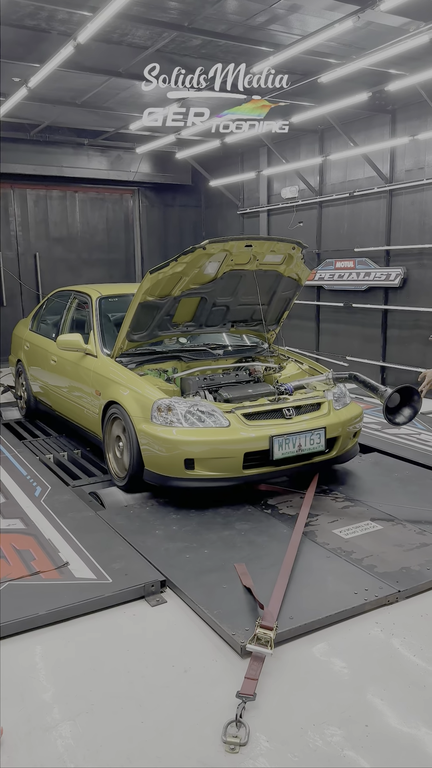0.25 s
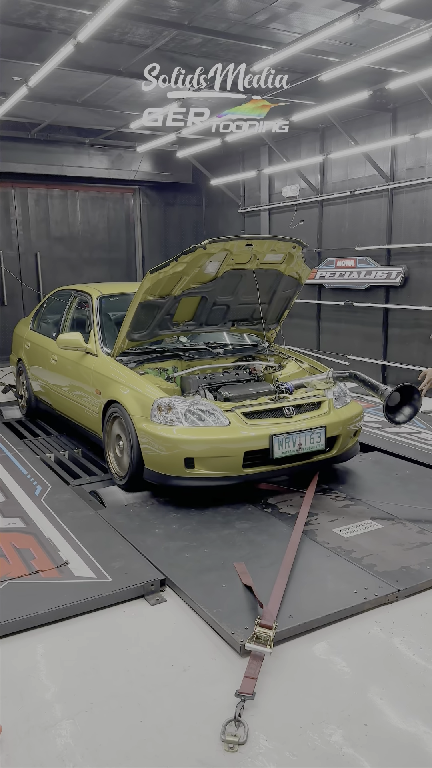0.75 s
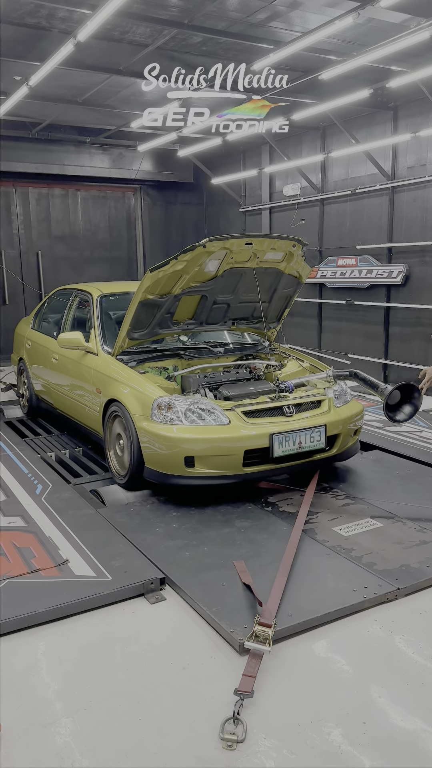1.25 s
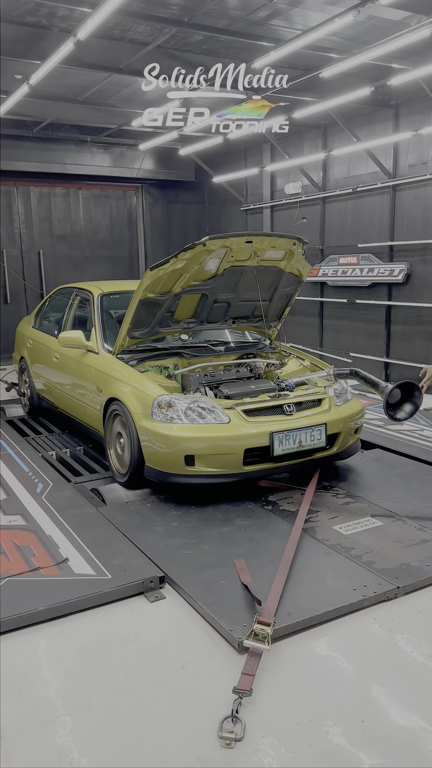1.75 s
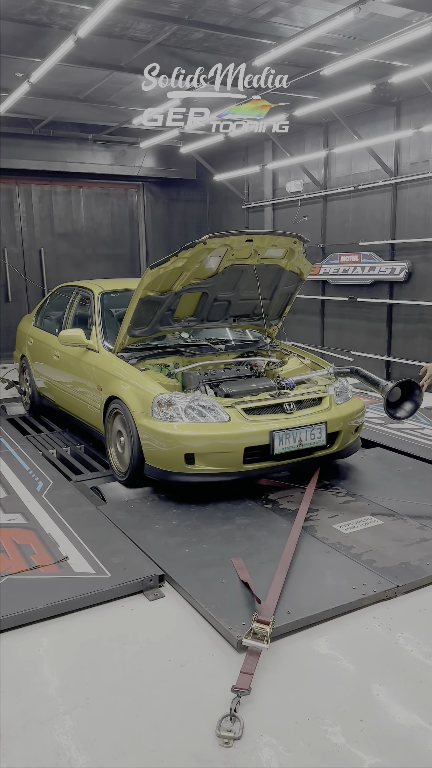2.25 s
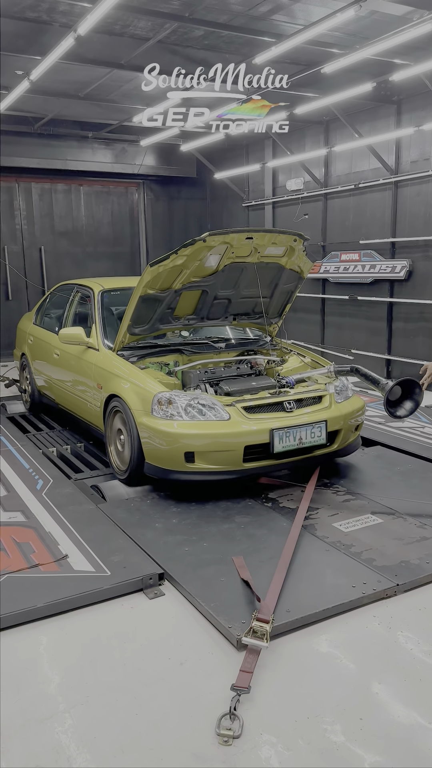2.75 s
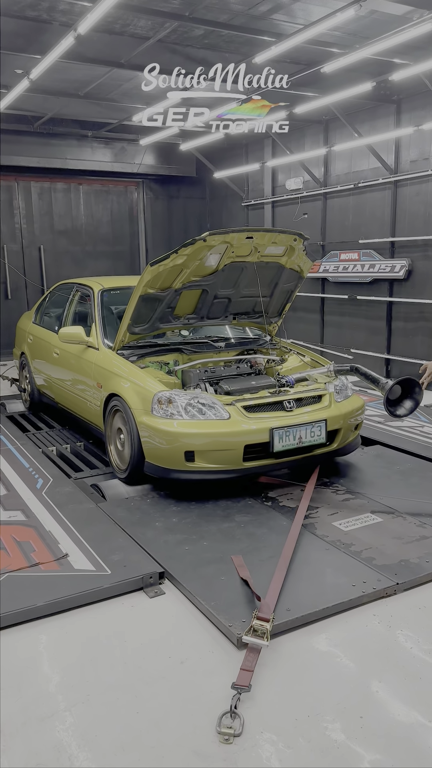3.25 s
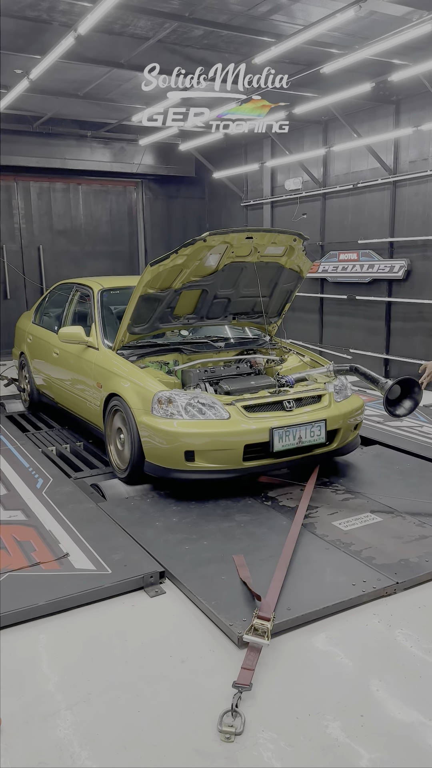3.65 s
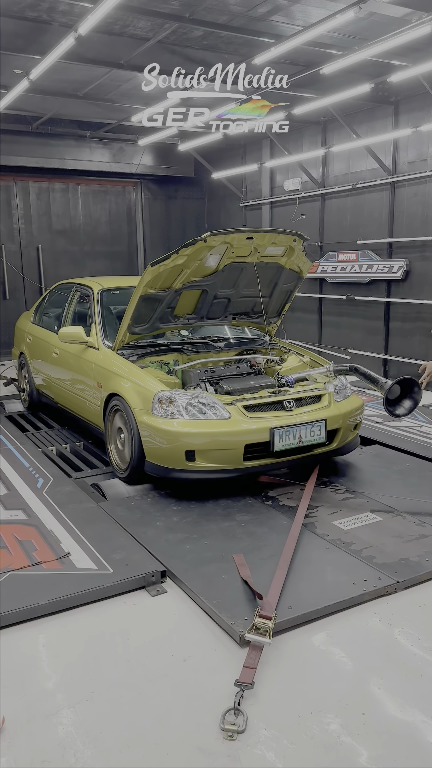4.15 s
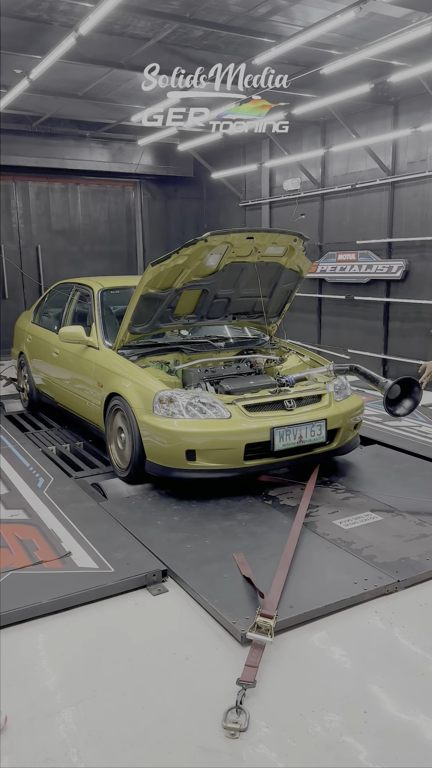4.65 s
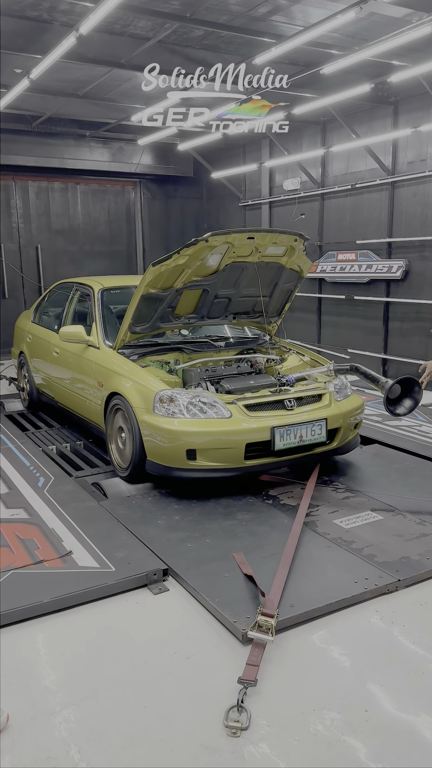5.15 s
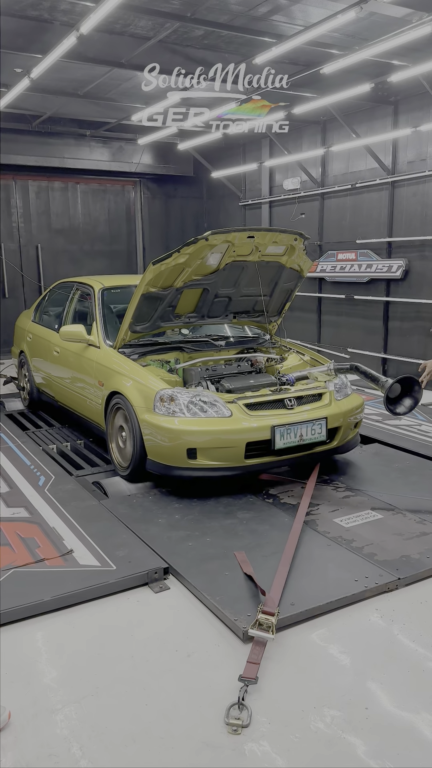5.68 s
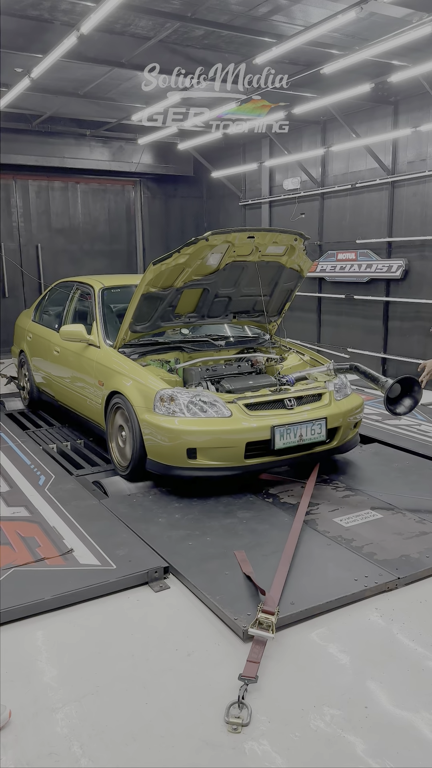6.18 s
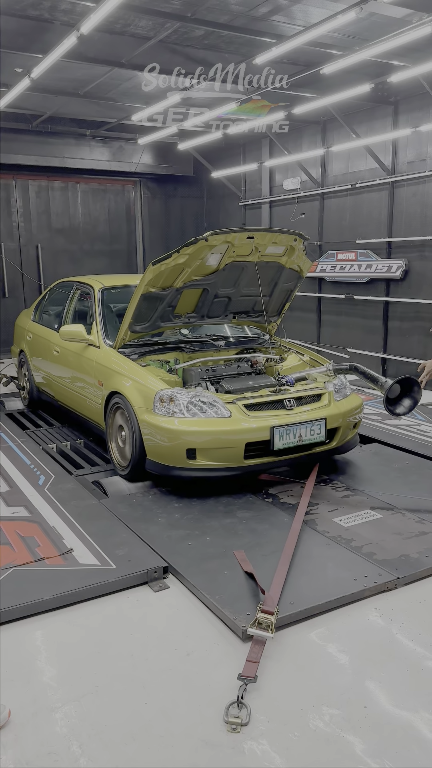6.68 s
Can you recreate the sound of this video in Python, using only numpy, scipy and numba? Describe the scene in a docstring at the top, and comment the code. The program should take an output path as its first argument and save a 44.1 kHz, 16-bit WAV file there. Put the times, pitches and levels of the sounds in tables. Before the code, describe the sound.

A four-cylinder car engine is already at full throttle on a roller dynamometer, heard close in a closed, hard-walled room with short reflections. Its roar rises steadily in pitch, with overtones swelling and fading along the way. At about 1.3 seconds a brief rasp marks the cam change, and the sound turns brighter and harder, with more valve clatter and hissing air. Around 2.4 seconds come a few very quick, light knocks and a swell of low rumble. The revs keep climbing until about 6 seconds, when the engine hits the limiter and stutters with rapid misfire thuds and an exhaust gurgle. At about 6.2 seconds the throttle shuts: the roar drops sharply and the engine coasts, falling in pitch, until the end near 7 seconds. Underneath run a faint fan hum, an uneven rumble and a low roller drone that is strongest at the end.

```python
"""In a closed, hard-walled room, a four-cylinder car engine pulls at full throttle on a roller dynamometer.
It switches to its high-speed cam, climbs to the rev limiter, misfires, and coasts with the throttle shut.
Periodic firing radiates orders, harmonics of the engine cycle, which swell and fade as they sweep through
the resonances of exhaust, intake and room. Valve-train clatter and turbulent hiss lie above them,
and the drone of the rollers, the hum of a fan motor and a lumpy low rumble lie beneath."""
import sys
import numpy as np
from scipy import signal
from scipy.fft import rfft, irfft, next_fast_len
from scipy.io import wavfile
from scipy.ndimage import uniform_filter1d
from numba import njit

SR = 44100
rng = np.random.default_rng(int(sys.argv[2]) if len(sys.argv) > 2 else 0)


def digitize_waveform(pressure):
    """Quantize a signal to 16-bit integers and store it at the path in sys.argv[1].

    Rows of a 2-D input are taken as channels; values are limited to [-1, 1].
    """
    field = np.atleast_2d(pressure).T
    bounded = np.clip(field, -1, 1)
    quanta = np.round(bounded * 32767).astype(np.int16)
    wavfile.write(sys.argv[1], SR, quanta)


N = 305172
BLOCK = 64  # samples per control value
TIMES, BLOCK_TIMES = np.arange(N) / SR, np.arange(N // BLOCK + 2) * BLOCK / SR
CAM_S, CAM_TAKES_S = 1.34, .022  # the cam changes over
SHUT_S, SHUT_TAKES_S = 6.235, .09  # the throttle closes
LOW_CAM_SPEEDS, HIGH_CAM_SPEEDS = [43.8, 47.5, 51.3], [51.5, 58, 64.5, 71, 77.5]  # cycles/s
FIRING_ORDER = 4  # one cycle is two crank turns and four firings

# Engine speed: (time [s], speed [cycles/s])
ENGINE_SPEED = [(0, 43.85), (.27, 45.2), (.56, 47), (1.02, 49.6), (1.98, 55.15), (2.91, 60.5), (4.1, 67.4),
                (4.93, 72.15), (5.41, 74.7), (5.84, 76.9), (5.99, 77.5), (6.13, 77.7), (6.19, 78.5),
                (6.24, 77), (6.32, 72.6), (6.42, 69.5), (6.65, 61.8), (6.8, 56.6), (6.92, 53.6)]
def engine_cycle():
    """Phase is the integral of speed: gives cycles turned at each sample and speed at each block."""
    turns = np.cumsum(curve(ENGINE_SPEED, np.arange(N + BLOCK) / SR)) / SR
    return turns, curve(ENGINE_SPEED, BLOCK_TIMES)


# Exhaust source: (order, level at 3 low-cam speeds [dB], at 5 high-cam speeds [dB], coasting [dB])
EXHAUST_ORDERS = [(1, -64, -49, -47, -45, -51.5, -50, -42.5, -45, -85),
                  (2, -36, -28, -25.5, -23, -24.5, -31.5, -36, -43, -70),
                  (3, -57, -37.5, -30.5, -23.5, -24.5, -30, -23, -27.5, -64),
                  (4, -6.5, -5.5, -2.5, -5, -8, -8, -8, -11, -26.5),
                  (8, -24, -23, -26, -26.5, -30, -29, -23, -30.5, -62)]
# Surges of the firing order after each fuel cut: (start [s], gain [dB], duration [s])
SURGES = [(6.003, 13.5, 0.03), (6.07, 13, 0.051), (6.137, 13, 0.062), (6.217, 4, 0.043), (6.295, 8.5, 0.01),
          (6.356, 5.5, 0.11)]
def exhaust_note(turns, speed, shut):
    """Periodic gas pulses form a harmonic series, weighted by the standing waves of the exhaust."""
    order, level_db = order_levels(EXHAUST_ORDERS, speed, shut)
    cooling = 1 + .05 * np.clip((BLOCK_TIMES - SHUT_S) / .2, 0, 1)  # cooler gas lowers the modes
    flattening = np.where(order > FIRING_ORDER, .65, .88) * shut  # coasting, the modes stand out less
    level_db += (1 - flattening) * standing_wave_db(order * speed * cooling)
    surge_db = sum(db * arch(BLOCK_TIMES - start, length) for start, db, length in SURGES)
    level_db += surge_db * (order == FIRING_ORDER)
    drift_db = .77 + 2.9 * shut * (order != FIRING_ORDER)
    return harmonics(turns, order, level_db, uneven_db=.7, drift_db=drift_db)


# Standing waves between tailpipe and listener: (frequency [Hz], bandwidth [Hz], gain [dB])
PIPE_MODES = [(66, 29.3, 5), (100.4, 5.4, -9), (118, 0.83, -32), (132.6, 10.2, 5.5), (148.8, 11.1, 2),
              (166, 1.3, -11), (186, 5.7, -20), (199.4, 6.3, -15.5), (219.3, 8.2, -8.5),
              (237.5, 19.7, -10.5), (252.6, 3, -18), (295.8, 14.6, 0), (357.3, 6.8, 4.5), (369, 4.5, 1),
              (380, 0.87, -3), (418.7, 8.5, 13.5), (454, 17, -10.5), (471.4, 3.7, 2), (499, 3.5, 4),
              (514, 27, 2.5), (593.4, 22.3, 14), (631.6, 6.9, 10)]
# Their cancellations: (frequency [Hz], bandwidth [Hz])
PIPE_NULLS = [(77.5, 2), (56, 3.7), (67.5, 4.2), (116.1, 4.8), (145.1, 2.4), (189.6, 3.4), (252.7, 7.8),
              (264.2, 14.6), (307.7, 11), (480, 2.8)]
def standing_wave_db(hz):
    """Interference reinforces a tone at the modes of the exhaust and partly cancels it at the nulls."""
    response = modal_sum(PIPE_MODES, hz)
    for centre, width in PIPE_NULLS:
        response *= 1 - .8 * resonator(hz, centre, width)
    return 20 * np.log10(abs(response) + 1e-3)


# Intake source: (order, level at 3 low-cam speeds [dB], at 5 high-cam speeds [dB], coasting [dB])
INTAKE_ORDERS = [(5, -71, -22, -26, -9.5, -18.5, -24, -25.5, -24.5, -51.5),
                 (6, -20, -24, -28, -36, -28.5, -19.5, -39.5, -25.5, -54),
                 (7, -33, -36, -24.0, -51, -27.5, -20.5, -33, -26, -58),
                 (9, -47, -30.5, -36, -17, -33.5, -19, -14, -23, -52),
                 (10, -33, -30, -29, -23.5, -26.5, -20, -33, -43, -53),
                 (11, -19.5, -23, -37, -34, -10, -25.5, -35.5, -35.5, -53),
                 (12, -30, -28.5, -28.5, -17, -24, -33, -27, -35.5, -64),
                 (13, -31.5, -20.5, -30, -12.5, -35.5, -33, -24.5, -18, -65),
                 (14, -30, -36, -35, -29, -24.5, -24, -17.5, -41, -64),
                 (15, -13.5, -25, -35, -24.0, -40, -30.5, -39.5, -36, -64),
                 (16, -25, -41, -36, -28, -19, -30, -30, -29, -52),
                 (17, -42, -35, -37, -23, -30, -40, -15.5, -18.5, -58),
                 (18, -26, -29.5, -27.5, -29, -28.5, -32.5, -13.5, -36, -62),
                 (19, -38, -36, -29, -27, -23.5, -18, -42, -24.5, -65),
                 (20, -37, -32, -30, -29.0, -24.5, -26, -23.5, -37, -60),
                 (21, -23.5, -26, -40, -35.5, -14.5, -27, -29, -30, -60),
                 (22, -26, -26, -31, -28, -34, -25, -26, -34, -56),
                 (23, -39, -46, -43, -27.5, -16, -40, -28, -33, -55),
                 (24, -23, -43, -40, -17.5, -19.5, -38, -46, -35, -49),
                 (25, -35, -32, -41, -25, -26.5, -36, -24.5, -41.0, -55),
                 (26, -40.0, -21, -21.5, -23, -28, -26.5, -28, -35, -56),
                 (27, -38.0, -33, -25, -23.5, -42, -29, -34, -27, -51),
                 (28, -29, -39, -44, -30, -27, -30, -43, -32, -54),
                 (29, -47, -28, -46, -32, -28, -47.5, -27, -29, -60),
                 (30, -22, -47, -36, -34, -29.5, -30.5, -32, -29.5, -60),
                 (31, -45, -31, -40, -20, -32, -32, -18, -44, -62),
                 (32, -54, -38, -42, -29, -31, -36, -30, -34, -64),
                 (33, -29, -53, -27, -40, -30, -27, -43, -29, -60),
                 (34, -35, -55, -31, -31, -43, -30, -39, -35, -65),
                 (35, -58, -28, -48, -42, -24.5, -31, -22, -42, -60),
                 (36, -44.0, -32, -45, -43, -32, -49, -29, -37, -53),
                 (37, -45, -39, -31, -35, -25, -38, -41, -47, -58),
                 (38, -28, -40, -51, -29, -33, -25.5, -28.5, -48, -56),
                 (39, -69, -33, -36.5, -40, -27, -55, -34, -57, -60),
                 (40, -53, -49, -34, -40, -55, -35, -46, -53, -61)]
# Strength of the roar: (time [s], gain [dB])
INTAKE_GAIN = [(0, -3.2), (.4, 1.8), (.8, -0.3), (1.25, 1.5), (1.4, -2), (1.7, 3.5), (2.0, 0.5),
               (2.4, -0.1), (3.0, 1), (3.6, -2.2), (4.1, -1), (4.6, 0.3), (5.1, -0.4), (5.6, 0.3),
               (5.95, 3), (6.1, 4), (6.3, -5.5), (6.9, 5)]
# Uneven firing at the cam change and the rev limiter: (time [s], level spread [dB])
STUMBLE = [(1.3, 0), (1.33, 2.0), (1.37, 0), (5.97, 0), (6.03, 1.5), (6.2, 1.8), (6.3, 2.5), (6.5, 1.0)]
def intake_roar(turns, speed, shut):
    """Forced vibration: intake pulses drive fixed modes, and uneven firing modulates the orders."""
    order, level_db = order_levels(INTAKE_ORDERS, speed, shut)
    level_db += curve(INTAKE_GAIN, BLOCK_TIMES)
    stumble_db = curve(STUMBLE, BLOCK_TIMES)
    wander = .011 * np.maximum(order - 9, 0) * stumble_db  # low orders stay locked in phase
    roar = harmonics(turns, order, level_db, uneven_db=.018 * order + stumble_db,
                     drift_db=.045 * order, drift_blocks=200, wander_turns=wander,
                     scatter_turns=.6)  # phases kept close: a throb each cycle
    return filtered(roar, room_and_bay)


# Modes of the room: (frequency [Hz], bandwidth [Hz], gain [dB])
ROOM_MODES = [(208.8, 4.46, 20.5), (296.2, 6.7, 2.8), (317, 3.3, 3.5), (335.3, 10.3, 8.5), (352, 2.7, -3.5),
              (396.3, 2.5, -2.5), (430.4, 15.5, 2), (449, 2.5, -12), (499.7, 9.4, 1.5), (520, 5.8, -3.5),
              (576, 7.5, 2), (590.5, 13, 6), (610.4, 7.6, -11), (633.6, 34, -7), (698.6, 19.5, -5.5),
              (737.3, 6.2, -1), (778.8, 48, 3), (802, 22, -18), (853.6, 4.2, -3.5), (877, 25, -8),
              (917, 21, -11), (963.4, 24, -5.5), (991, 3.4, -9.5)]
# Modes of intake and engine bay: (frequency [Hz], bandwidth [Hz], gain [dB])
BAY_MODES = [(1073.7, 7.7, -11.5), (1111, 28.5, -4), (1162, 59, -8.5), (1185, 8.5, -7.5), (1236, 42, -13),
             (1290, 32, -14), (1358, 57, -16), (1340, 28, -29), (1437, 56, -9), (1516, 34, -11.5),
             (1567, 30, -6), (1616, 17, -23), (1704, 70, -13.5), (1752, 8.1, -11), (1808, 40.5, -5),
             (1840, 12, -9), (1907, 28, -12), (1880, 20, -18.5), (1972, 100, -13.5), (2040, 49, -31),
             (2165, 16, -27), (2320, 27.1, -26), (2300, 81, -21.5), (2440, 30, -12), (2574, 70, -26.5),
             (2860, 150, -5.5), (3036, 50.4, 9.5)]
def room_and_bay(hz):
    """Modal superposition: the modes add into peaks and cancel into notches between neighbours."""
    return modal_sum(ROOM_MODES + BAY_MODES, hz) * (hz < 6000)


# Spectrum of valve train and block: (frequency [Hz], level [dB])
CLATTER_SPECTRUM = [(1800, -43), (2100, -43.5), (2400, -59), (2650, -50), (2900, -46), (3080, -48),
                    (3260, -66), (3450, -52), (3750, -51.5), (4000, -53), (4250, -49), (4400, -56),
                    (4570, -50), (4850, -56.5), (5150, -62.5), (5650, -50.5), (5950, -62), (6300, -54),
                    (6700, -57), (7200, -55), (8000, -80), (9000, -99)]
# Strength of the clatter: (time [s], gain [dB])
CLATTER_GAIN = [(0, -12), (1.3, -7), (1.4, -1.5), (1.9, 1), (2.6, 1.5), (3.3, -1), (4.0, 1.5), (4.7, -1),
                (5.5, -3), (6.15, -2.5), (6.25, -27), (6.9, -25)]
# Covers and brackets that ring up or fall quiet: (speed [cycles/s], frequency [Hz], gain [dB])
PANEL_RINGS = [(55.9, 2900, 2.5), (59.2, 3140, 4.5), (65.3, 2950, -9), (67.7, 3000, 2.5), (69.5, 3100, -4),
               (63.5, 3600, -3), (69.3, 3600, 3), (73.3, 3550, 8), (59, 7300, 4), (70, 4550, 5),
               (73.5, 4400, -5), (59.3, 6000, 7), (63.4, 6200, 4), (64.5, 6320, 10), (69.4, 6450, 9),
               (72.3, 6420, 17.5), (58.4, 5200, 3), (70, 5900, 6)]
def valve_clatter(turns, speed, shut):
    """Repeated impacts radiate high orders, loosely locked to the crank and shaped by panel resonance."""
    order = np.arange(41, 136)[:, None]
    tone_hz = order * speed
    ring_db = sum(db * np.exp(-((speed - ring_speed) / 1.2) ** 2 - ((tone_hz - hz) / 130) ** 2)
                  for ring_speed, hz, db in PANEL_RINGS)
    level_db = spectrum(CLATTER_SPECTRUM, tone_hz) + ring_db * (1 - shut)
    level_db += curve(CLATTER_GAIN, BLOCK_TIMES)
    return harmonics(turns, order, level_db, uneven_db=4, drift_db=3, drift_blocks=110, wander_turns=.05)


# Strength of the air rush: (time [s], gain [dB])
RUSH_GAIN = [(0, -33), (.6, -31.5), (1.3, -32), (1.33, -27), (1.41, -30.5), (1.66, -27), (2.03, -27.5),
             (2.2, -23), (2.62, -23), (3.4, -27), (3.53, -24), (3.93, -27), (4.48, -23), (5.0, -24.5),
             (5.76, -29), (6.13, -24.5), (6.23, -33), (6.92, -40.5)]
# Rush with the throttle open, and shut: (frequency [Hz], spectral level [dB])
RUSH_OPEN = [(30, -13), (60, 7), (150, 2), (300, 9), (500, 9), (800, 12.5), (1300, 13), (2300, 5.5),
             (2900, 5), (3120, -9), (3260, 4.5), (3450, -3.5), (4300, -.5), (5300, 4), (6400, 3.5),
             (9500, 1), (11500, -8), (15000, 0.5)]
RUSH_SHUT = [(30, 5), (60, 11), (150, 6), (400, 5), (900, 5.5), (1500, 9), (2500, 5.5), (4000, -2),
             (6500, 0.5), (9500, -5.5), (11500, -30), (15000, -5)]
def air_rush(turns, shut):
    """Broadband intake and tyre noise in two incoherent parts, amplitude-modulated by the firings."""
    phase = 2 * np.pi * turns[:N]
    puffs = .17 * np.cos(phase) + .12 * np.cos(FIRING_ORDER * phase)
    noise = rng.standard_normal((2, N)) * (1 + puffs * (1 - shut)) * flicker(db=.8, blocks=29)
    opened = filtered(noise, lambda hz: gain_of(spectrum(RUSH_OPEN, hz))
                      * abs(room_and_bay(np.clip(hz, 200, 2200))) ** .34)
    lows = filtered(opened, lambda hz: 1 / (1 + (hz / 2200) ** 8))
    opened -= .5 * ramp(CAM_S, CAM_TAKES_S) * lows  # brighter on the high cam
    closed = coloured(noise, RUSH_SHUT)
    return gain_of(curve(RUSH_GAIN)) * ((1 - shut) * opened + shut * closed)


# Misfires at the rev limiter: (start [s], level [dB], duration [s])
MISFIRES = [(5.994, -27, 0.074), (6.068, -23, 0.023), (6.094, -24, 0.027), (6.143, -28, .035),
            (6.195, -29, 0.026), (6.17, -35, 0.023), (6.222, -24, 0.046), (6.248, -32, 0.046),
            (6.29, -39, 0.13)]
def misfire_thuds(boom_hz=110, width_hz=36):
    """Transient excitation: each misfire booms in the pipe, roughened by random frequency modulation."""
    out, t = np.zeros(N), np.arange(round(.15 * SR)) / SR
    for start, db, length in MISFIRES:
        deviation_hz = width_hz / 2 * unit_rms(uniform_filter1d(rng.standard_normal(len(t)), 300))
        boom = np.sin(2 * np.pi * (boom_hz * t + np.cumsum(deviation_hz) / SR))
        out[round(start * SR):][:len(t)] += 2 * gain_of(db) * arch(t, length) * boom
    return out


# Gurgle between the misfires: (time [s], level [dB])
BURBLE_LEVEL = [(5.99, -60), (6.02, -36), (6.2, -27), (6.25, -23), (6.36, -37), (6.45, -55), (6.6, -78)]
# Its colour: (frequency [Hz], relative spectral level [dB])
BURBLE_SPECTRUM = [(40, -22), (80, 8), (200, 6), (300, 7), (500, -5), (900, -14), (1500, -53)]
def exhaust_burble():
    """Unburnt mixture gurgles in the pipe: low noise under random amplitude modulation."""
    lumps = flicker(db=3, blocks=8)
    gurgle = unit_rms(coloured(rng.standard_normal(N) * lumps, BURBLE_SPECTRUM))
    return gurgle * gain_of(curve(BURBLE_LEVEL)) * ramp(BURBLE_LEVEL[0][0], .02)


# Bands in which the intake rasps: (frequency [Hz], bandwidth [Hz], level at the crest [dB])
BARK_BANDS = [(686, 60, -26), (775, 70, -23), (900, 80, -32)]
def cam_bark(start_s=1.305, length_s=.05):
    """Resonant filtering turns a burst of intake air into a rasp as the cam locks in."""
    noise = rng.standard_normal(N)
    rasp = sum(gain_of(db) * unit_rms(filtered(noise, lambda hz: resonator(hz, centre, width).real))
               for centre, width, db in BARK_BANDS)
    return rasp * arch(TIMES - start_s, length_s) ** 2


# Resonances met while coasting: (frequency [Hz], bandwidth [Hz], tone level [dB])
OVERRUN_MODES = [(458, 37, -44), (492, 19, -34.5), (511, 18, -35), (546, 7.2, -36), (580, 10, -36),
                 (647, 20, -37.5), (683, 25, -48), (720, 20, -43), (750, 15, -38.5), (840, 20, -42),
                 (867, 16, -43)]
def overrun_tones(turns, speed, shut):
    """With the throttle shut, two firing overtones swell each time they fall through a resonance."""
    order = FIRING_ORDER * np.array([[2], [3]])
    power = sum((gain_of(db) * resonator(order * speed, centre, width).real) ** 2
                for centre, width, db in OVERRUN_MODES)
    return harmonics(turns, order, 10 * np.log10(power * shut ** 2 + 1e-12), uneven_db=1, drift_db=1)


# Four brief knocks that jump out between left and right: (start [s], relative level [dB])
KNOCKS = [(2.412, -6), (2.432, -2), (2.447, -10), (2.463, 3)]
def stereo_knocks():
    """Tone bursts a few periods long are heard as knocks; the lower of the two tones lasts longer."""
    out, t = np.zeros(N), np.arange(800) / SR
    low = .75 * np.sin(2 * np.pi * 270 * t) * arch(t, .009) ** 2
    high = .9 * np.sin(2 * np.pi * 660 * t) * arch(t, .0045)
    for start, db in KNOCKS:
        out[round(start * SR):][:len(t)] += gain_of(db) * (low + high) / 2
    return out


# The finest hiss: (frequency [Hz], spectral level [dB])
FIZZ_SPECTRUM = [(9000, -35), (11000, -47), (13500, 0), (15000, -14)]
# Its strength: (time [s], gain [dB])
FIZZ_GAIN = [(0, -75), (2, -65), (2.4, -31), (4, -29), (6.1, -33), (6.3, -60), (6.92, -65)]
def air_fizz():
    """Band-limited noise in two incoherent parts flickers in the top octave during the fast pull."""
    noise = rng.standard_normal((2, N)) * flicker(db=1.3, blocks=44)
    return coloured(noise, FIZZ_SPECTRUM) * gain_of(curve(FIZZ_GAIN))


# Drone of the heavy rollers: (time [s], frequency [Hz], rms level [dB])
ROLLER_DRONE = [(0, 28, -56), (3, 38.5, -61), (4.3, 43, -57), (6, 49, -44), (6.92, 48.4, -44)]
def roller_drone():
    """Rotation radiates a low tone of wavering level; inertia carries it on as the engine slows."""
    times, hz, db = np.transpose(ROLLER_DRONE)
    amplitude = np.sqrt(2) * gain_of(np.interp(TIMES, times, db)) * flicker(db=2.3, blocks=110)
    return amplitude * np.sin(2 * np.pi * np.cumsum(np.interp(TIMES, times, hz)) / SR)


# Lumpy low rumble, different in left and right: (time [s], level [dB])
RUMBLE_LEVEL = [(0, -38), (.85, -44), (1.0, -56), (2.3, -56), (2.5, -33), (2.75, -54), (3.9, -46),
                (4.3, -66), (4.65, -51), (4.85, -39), (5.05, -61), (5.35, -41), (5.6, -51), (6.2, -48),
                (6.5, -71), (6.92, -67)]
# Its colour: (frequency [Hz], relative spectral level [dB])
RUMBLE_SPECTRUM = [(30, -13), (60, -9), (130, 11), (250, -11), (500, -47)]
def low_rumble():
    """Random amplitude modulation makes low noise lumpy; left and right are incoherent."""
    lumps = flicker(db=4.5, blocks=45, count=2)
    rumble = unit_rms(coloured(rng.standard_normal((2, N)) * lumps, RUMBLE_SPECTRUM))
    return rumble * gain_of(curve(RUMBLE_LEVEL))


# Fan motor: (frequency [Hz], rms level [dB])
FAN_TONES = [(113.0, -53)]
def fan_hum():
    """A motor at constant speed radiates a fixed pitch, here wavering a little in level."""
    return sum(np.sqrt(2) * gain_of(db) * flicker(db=2, blocks=80) * np.sin(2 * np.pi * hz * TIMES)
               for hz, db in FAN_TONES)


def reflections(hz, t60):
    """Reverberation: the response of random echoes of mean power 1, falling 60 dB in t60 seconds."""
    t = np.arange(SR // 2) / SR
    tail = rng.standard_normal(len(t)) * gain_of(-60 * t / t60)
    return rfft(tail / np.linalg.norm(tail), 2 * len(hz) - 2)


# Stereo width: (frequency [Hz], gain of the side signal [dB])
SIDE_GAIN = [(30, -16), (60, -34), (110, -40), (200, -23.5), (290, -24.5), (380, -18.5), (700, -11.5),
             (1290, -15), (2380, -8), (3250, 9.5), (4400, -5.5), (8120, -1.5), (15000, -0.5)]
def stereo_side(engine, air):
    """A side signal in quadrature makes left and right differ in phase; reflections, in level too."""
    side = filtered(engine, lambda hz: 1j * abs(reflections(hz, t60=.0093))
                    + .7 * reflections(hz, t60=.15))
    side += filtered(air[0], lambda hz: .7j * np.sign(reflections(hz, t60=.0081).real)) + 1.2 * air[1]
    return coloured(side, SIDE_GAIN)


def order_levels(table, speed, shut):
    """Interpolation over speed, cam and throttle gives each order its level in dB."""
    table = np.array(table)
    split = 1 + len(LOW_CAM_SPEEDS)
    low_db = np.array([np.interp(speed, LOW_CAM_SPEEDS, row[1:split]) for row in table])
    high_db = np.array([np.interp(speed, HIGH_CAM_SPEEDS, row[split:-1]) for row in table])
    pull_db = low_db + ramp(CAM_S, CAM_TAKES_S, BLOCK_TIMES) * (high_db - low_db)
    return table[:, :1], pull_db + shut * (table[:, -1:] - pull_db)


def harmonics(turns, order, level_db, uneven_db, drift_db,
              drift_blocks=300, wander_turns=0, scatter_turns=1):
    """Fourier synthesis of orders that vary from cycle to cycle, drift slowly and wander in phase."""
    count = len(order)
    level_db = level_db + uneven_db * wobble(count, blocks=12) + drift_db * wobble(count, drift_blocks)
    wander = np.exp(2j * np.pi * wander_turns * wobble(count, blocks=30))
    amplitude = np.sqrt(2) * gain_of(level_db) * wander
    return phasor_sum(turns, order.ravel().astype(float), scatter_turns * rng.random(count), amplitude)[:N]


@njit
def phasor_sum(turns, order, start, amplitude):
    """Each order is the real part of a phasor that rotates steadily through a block."""
    out = np.zeros(len(turns))
    for k in range(len(order)):
        for b in range(len(turns) // BLOCK):
            first = BLOCK * b
            phasor = amplitude[k, b] * np.exp(2j * np.pi * (order[k] * turns[first] + start[k]))
            rate = (turns[first + BLOCK - 1] - turns[first]) / (BLOCK - 1)
            step = np.exp(2j * np.pi * order[k] * rate)
            step *= (amplitude[k, b + 1] / amplitude[k, b]) ** (1 / BLOCK)
            for i in range(first, first + BLOCK):
                out[i] += phasor.real
                phasor *= step
    return out


def resonator(hz, centre, width):
    """Complex response of a damped oscillator near resonance."""
    return 1 / (1 + 2j * (hz - centre) / width)


def modal_sum(modes, hz):
    """Linear superposition of damped modes."""
    return sum(gain_of(db) * resonator(hz, centre, width) for centre, width, db in modes)


def filtered(x, response):
    """Convolution as a product of spectra; the response is a function of frequency."""
    size = 2 * next_fast_len(N // 2 + SR // 2)
    return irfft(rfft(x, size) * response(np.fft.rfftfreq(size, 1 / SR)), size)[..., :N]


def coloured(x, rows):
    """Zero-phase filtering by a table of (frequency [Hz], gain [dB])."""
    return filtered(x, lambda hz: gain_of(spectrum(rows, hz)))


def wobble(count, blocks):
    """A moving average turns white noise into slow drifts of rms 1, one value a block."""
    return unit_rms(uniform_filter1d(rng.standard_normal((count, len(BLOCK_TIMES))), blocks, axis=1))


def flicker(db, blocks, count=1):
    """Log-normal amplitude modulation: a gain at every sample, with a spread of db."""
    return np.repeat(gain_of(db * wobble(count, blocks)), BLOCK, axis=1)[:, :N].squeeze()


def spectrum(rows, hz):
    """Interpolation on a log-frequency axis."""
    frequency, db = np.transpose(rows)
    return np.interp(np.log(hz + 1), np.log(frequency + 1), db)


def curve(rows, t=TIMES):
    """Linear interpolation in time."""
    return np.interp(t, *np.transpose(rows))


def ramp(centre_s, takes_s, t=TIMES):
    """Linear transition from 0 to 1."""
    return curve([(centre_s - takes_s / 2, 0), (centre_s + takes_s / 2, 1)], t)


def arch(t, length):
    """Half-sine envelope."""
    return np.sin(np.pi * np.clip(t / length, 0, 1))


def gain_of(db):
    """Amplitude ratio of a level in decibels."""
    return 10 ** (np.asarray(db) / 20)


def unit_rms(x):
    """Normalisation to mean power 1."""
    return x / np.sqrt(np.mean(abs(x) ** 2) + 1e-20)


# Stereo balance: (frequency [Hz], left minus right [dB])
BALANCE = [(60, 0), (110, 0), (200, 0.5), (380, 0.5), (700, 1.5), (1290, 0.0), (2380, -1), (4400, 1.5),
           (8120, 0.5), (15000, -1)]
def scene():
    """Superposition in mid and side: the engine's bass is near mono, its treble wide."""
    turns, speed = engine_cycle()
    shut = ramp(SHUT_S, SHUT_TAKES_S, BLOCK_TIMES)
    engine = exhaust_note(turns, speed, shut) + intake_roar(turns, speed, shut)
    engine += overrun_tones(turns, speed, shut) + valve_clatter(turns, speed, shut)
    air = air_rush(turns, ramp(SHUT_S, SHUT_TAKES_S)) + air_fizz()
    engine += misfire_thuds() + exhaust_burble() + cam_bark()
    # the hard walls carry the upper roar on
    engine = filtered(engine, lambda hz: 1 + .13 * reflections(hz, t60=.3) * (hz > 700))
    side = stereo_side(engine, air) + stereo_knocks()
    mid = engine + air[0] + fan_hum() + roller_drone()
    stereo, halves = np.array([mid + side, mid - side]), np.array([[.5], [-.5]])
    return filtered(stereo, lambda hz: gain_of(halves * spectrum(BALANCE, hz))) + low_rumble()


def record(dry):
    """Soft saturation rounds the loudest peaks, then a low-pass filter limits the band."""
    soft = 1.15 * np.tanh(dry / 1.15)
    low_pass = signal.firwin(1023, 15650, window=("kaiser", 9), fs=SR)
    return signal.oaconvolve(soft, low_pass[None], "same")


dry = scene()
out = record(dry)
digitize_waveform(out)
```